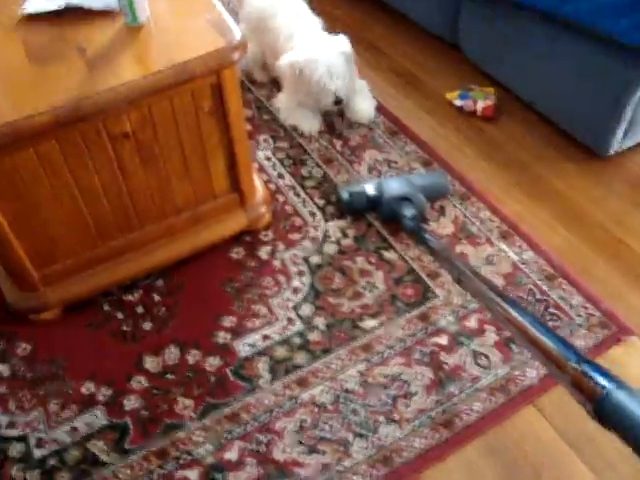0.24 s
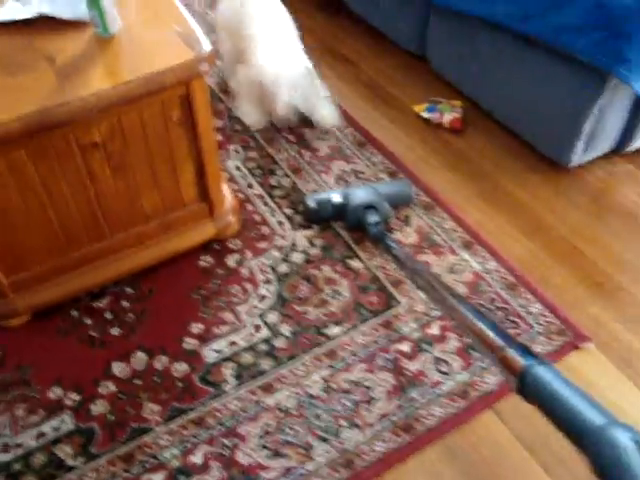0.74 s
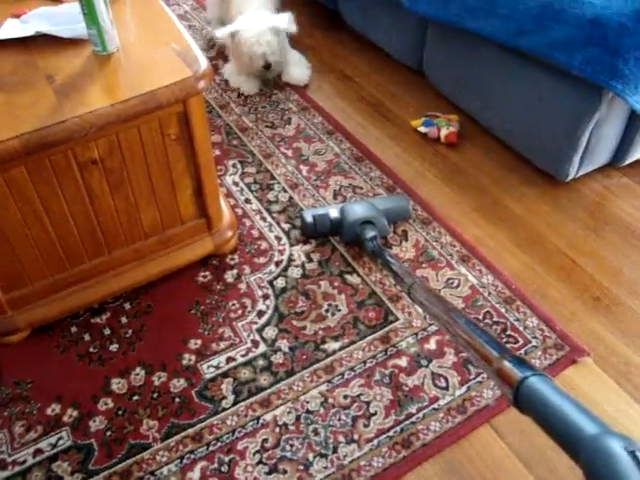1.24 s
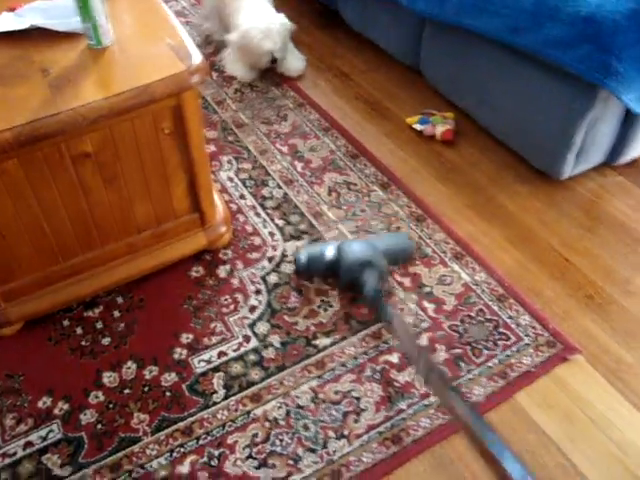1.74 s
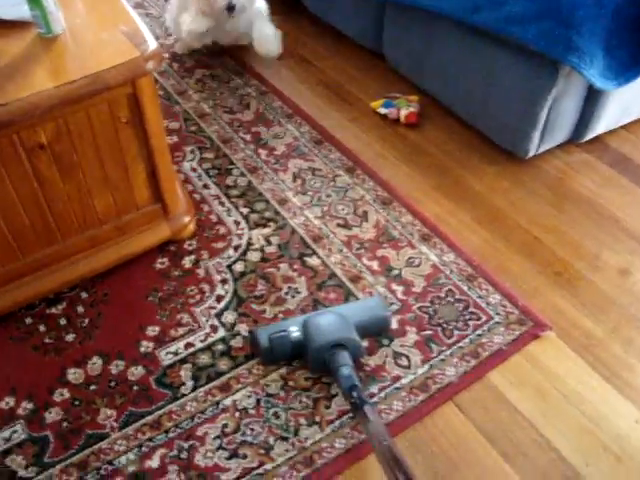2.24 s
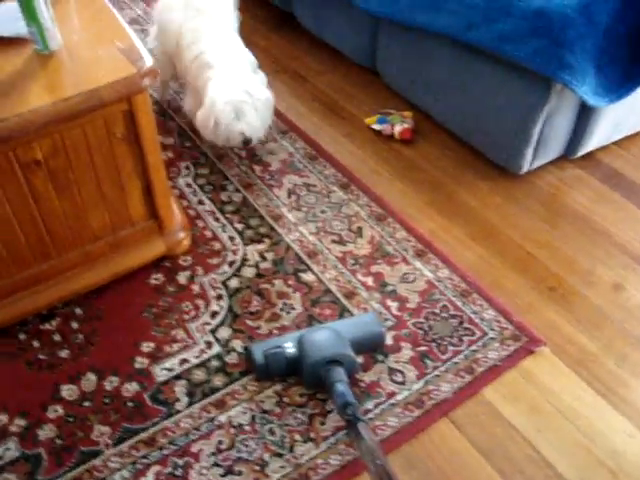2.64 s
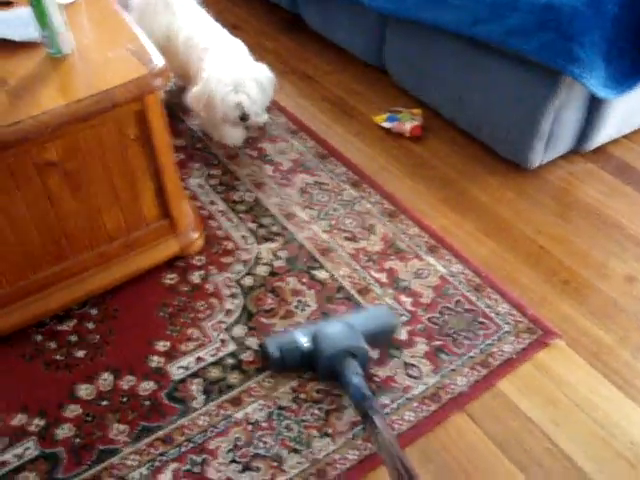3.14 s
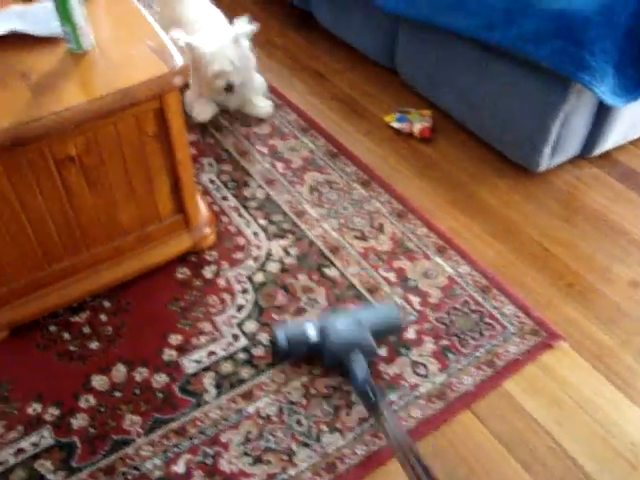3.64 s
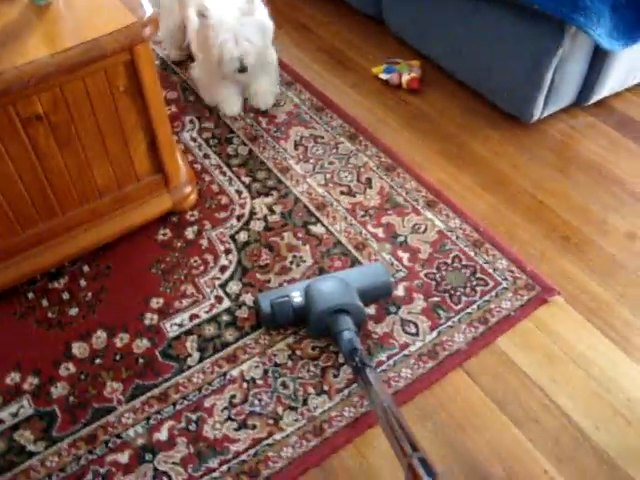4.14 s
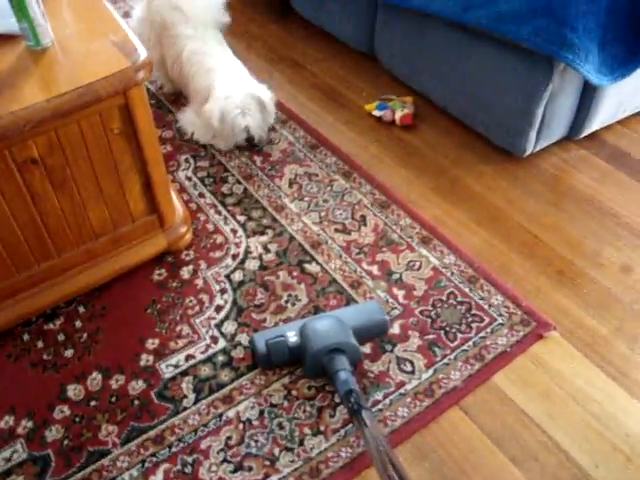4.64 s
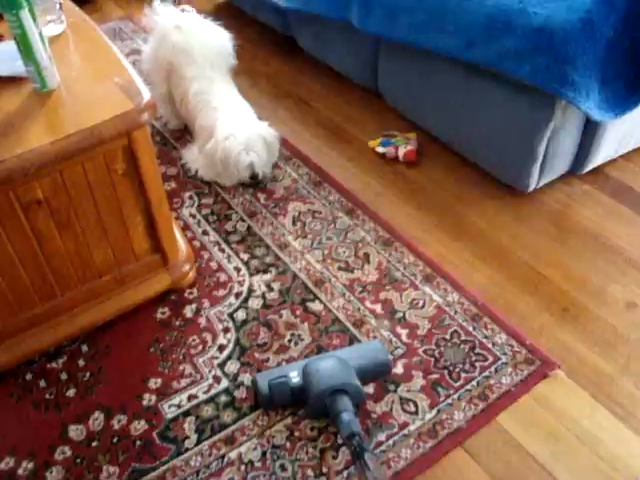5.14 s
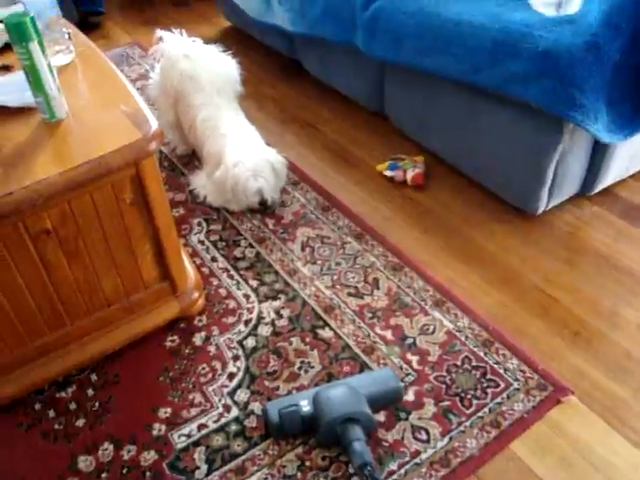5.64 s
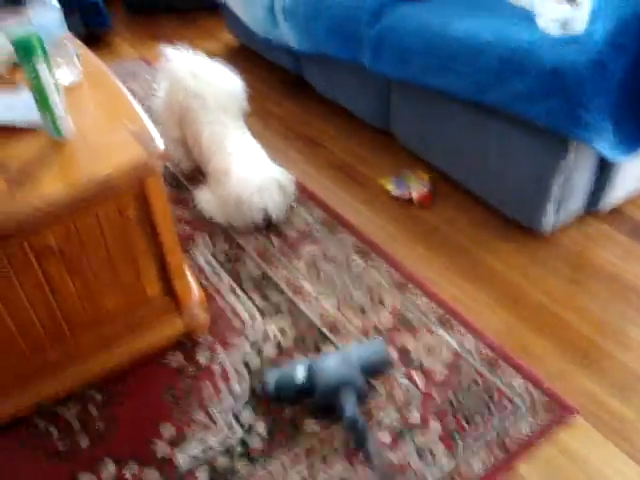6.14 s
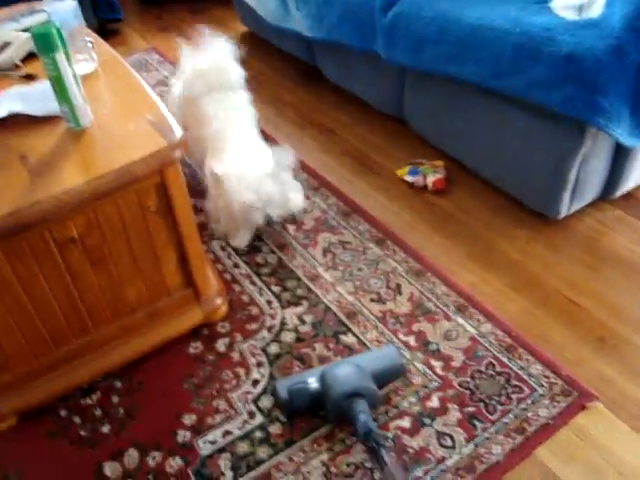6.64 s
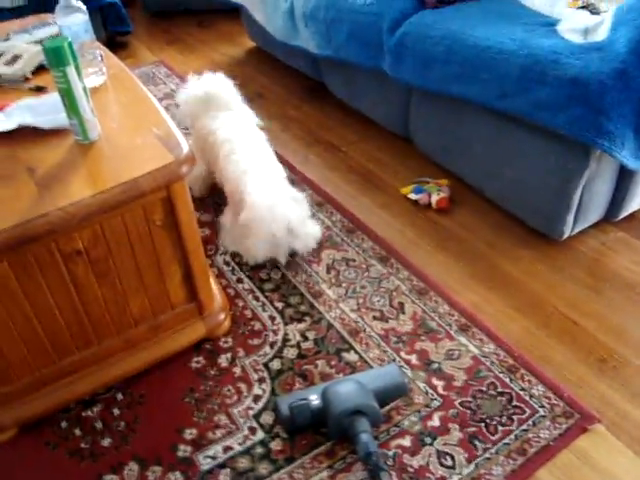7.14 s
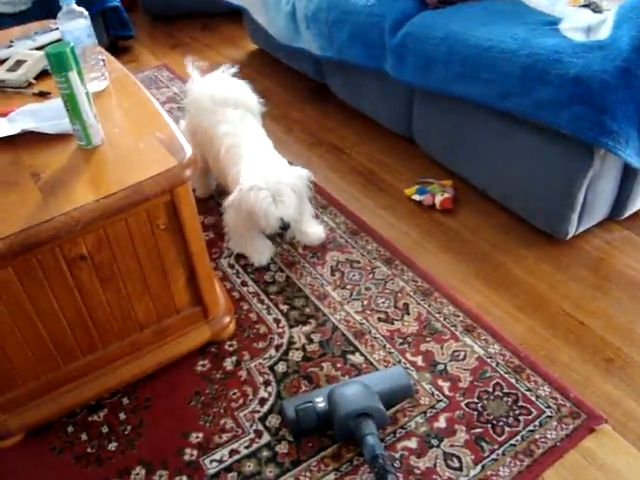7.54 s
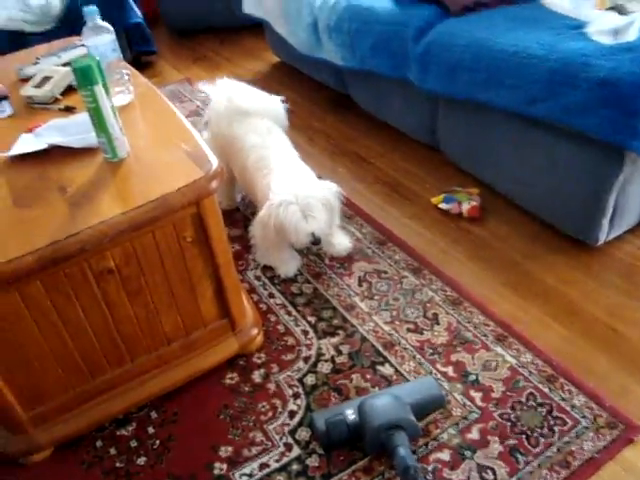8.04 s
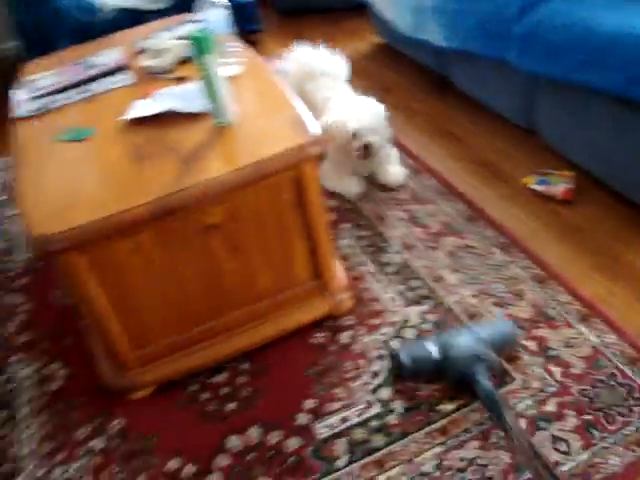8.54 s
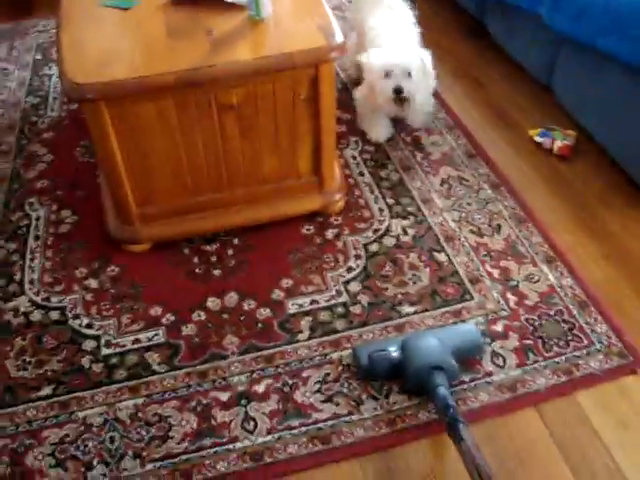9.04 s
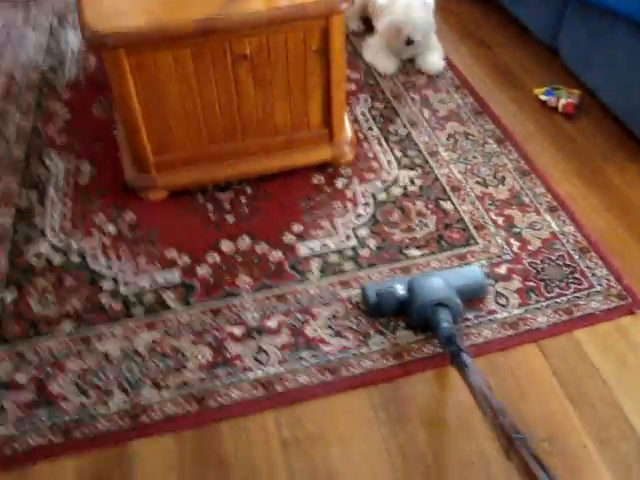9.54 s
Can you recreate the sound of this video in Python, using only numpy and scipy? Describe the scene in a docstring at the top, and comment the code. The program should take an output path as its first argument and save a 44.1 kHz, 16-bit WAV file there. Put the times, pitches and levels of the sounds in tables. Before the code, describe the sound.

Small excitable dog barks hoarsely at a running vacuum in a living room, pausing about two seconds midway before yapping again.

```python
"""A vacuum cleaner whines over rushing air, and at once a small dog yaps at it in quick runs in a living room.
The motor sounds harmonics of its shaft speed, with filtered noise for the air; each bark is a rough harmonic
source filtered by gliding throat resonances, and one faint whimper is a sagging near-sine. The room rings
after the dog; a small camera's gain control ducks at loud barks and creeps back up in the pauses."""
import sys
import numpy as np
from scipy import signal
from scipy.io import wavfile
from scipy.ndimage import uniform_filter1d

SR = 44100
rng = np.random.default_rng(int(sys.argv[2]) if len(sys.argv) > 2 else 0)


def output_pcm(signal):
    """Save a mono or channel-first signal as 16-bit PCM at the path in sys.argv[1].

    Samples are clipped to [-1, 1] before scaling.
    """
    pcm = np.clip(np.atleast_2d(signal).T, -1, 1) * 32767
    wavfile.write(sys.argv[1], SR, np.round(pcm).astype(np.int16))


N = 431298  # samples


def gain_of(db):
    """Amplitude ratio of a level difference: twenty decibels to a factor of ten."""
    return 10 ** (np.asarray(db) / 20)


def evened(x):
    """Normalization to unit mean power (rms 1)."""
    return x / np.sqrt(np.mean(x ** 2) + 1e-20)


def read(points, hz):
    """Interpolation of spectrum points along a logarithmic frequency axis."""
    f, value = np.transpose(points)
    return np.interp(np.log(hz + 1), np.log(f + 1), value)


def columns(rows, t):
    """Linear interpolation in time of each column of a table of curves."""
    s, *rest = np.transpose(rows)
    return [np.interp(t, s, c) for c in rest]


def add(mix, s, sound):
    """Superposition: a sound is summed into the mix from s seconds on."""
    part = mix[round(s * SR):][:len(sound)]
    part += sound[:len(part)]


def wander(count, span):
    """Low-pass random fluctuation: noise averaged twice over span samples, rms 1."""
    once = uniform_filter1d(rng.standard_normal(count), int(span))
    return evened(uniform_filter1d(once, int(span)))


def resonate(x, hz, width):
    """Resonance by heterodyning: shift the frequency hz to zero, low-pass, shift back; peak gain 1."""
    turn = np.exp(2j * np.pi * np.cumsum(hz * np.ones(len(x))) / SR)
    r = np.exp(-np.pi * width / SR)
    return 2 * (turn * signal.lfilter([1 - r], [1, -r], x / turn)).real


def air(spectrum, patchy_db):
    """Turbulence as random-phase noise with a given spectrum and drifting patches, rms 1."""
    frames, hz = N // 256 + 5, np.fft.rfftfreq(1024, 1 / SR)
    a, b, patches = rng.standard_normal((frames, 513, 3)).T
    patches = evened(uniform_filter1d(uniform_filter1d(patches, size=10, axis=0), size=12, axis=1))
    z = (a + 1j * b) * gain_of(read(spectrum, hz)[:, None] + patchy_db * patches)
    return evened(signal.istft(z, nperseg=1024, noverlap=768)[1][:N])


def vacuum():
    """Rotating machinery sounds at multiples of its shaft speed; the airflow adds whistles, rush and roar."""
    # Motor speed. Each row: time in seconds, blade-passing tone in Hz.
    motor = [(0, 5913), (.63, 5912), (1.3, 5932), (1.7, 5929), (2.1, 5908), (3, 5905), (4, 5902),
             (4.5, 5912), (5.6, 5919), (6.3, 5917), (6.8, 5908), (7.8, 5916), (8.3, 5911), (8.9, 5902),
             (9.3, 5911), (9.78, 5905)]
    # Shaft orders. Each row: multiple of shaft speed, level in dB before the swells.
    shaft = [(1, -39), (2, -53), (4, -54), (6, -57.5), (8, -68.5), (9, -40.5), (10, -62), (11, -69)]
    # Air whistles in hose and floor head. Each entry: centre in Hz.
    hose_hz = [192, 240, 387, 435, 472, 872, 969, 2891, 3176, 4598, 5583, 5749]
    # The same whistles. Each row: width in Hz, level in dB before the swells.
    hose = [(10, -63), (16, -62), (6, -55), (12, -54), (14, -56), (55, -47), (30.5, -50), (12, -50),
            (25, -56.5), (16, -75), (16, -57), (20, -59.5)]
    # Spectrum of the rushing air. Each row: frequency in Hz, relative density in dB per Hz.
    rush_spectrum = [(290, -58.5), (500, -18.5), (613, -18), (646, -8.5), (772, -14), (959, -13),
                     (1790, -14.5), (2810, -15), (5250, -21), (6120, -18), (6360, -24.5), (9820, -24.5),
                     (10600, -80.5), (13800, -83), (22000, -120)]
    # Spectrum of the floor-head roar. Each row: frequency in Hz, relative density in dB per Hz.
    roar_spectrum = [(30, -4.5), (110, -28.5), (180, -16), (300, -8), (450, 4), (600, -1.5), (800, -41.5)]
    # Swells and dips as the cleaner and camera move. Each row: time in seconds, then changes in dB
    # of the shaft hum, of the blade whine, and of the roar with the low whistles.
    swell = [(0, -1.5, -6.5, -3), (.6, -0.5, 0.5, -1.5), (.95, -3.5, -3, -2), (1.3, 0, 3, -3),
             (1.6, 1, 6, -1), (1.9, 1, -6.5, -1), (2.2, -4, -0.5, -4.5), (2.8, -2.5, 4.5, 1),
             (3.2, -0.5, 1.5, -1.5), (3.8, -8, -1, 0.5), (4.3, 2.5, 1.5, -3), (4.9, 1, -0.5, 2),
             (5.5, 1.5, 1, 0.5), (6.3, 4.5, -2, 2.5), (7, -2, -4.5, -3), (7.6, 1, 1, 3),
             (8.2, 3, -0.5, 4.5), (8.9, -6, 0, -2.5), (9.3, -1, 0, -3), (9.78, -2.5, -4, -2)]
    # Nearness of the cleaner. Each row: time in seconds, level change in dB.
    near = [(0, 7.5), (.63, 0.5), (1.3, 2), (1.8, -1), (2.3, -0.5), (3, 0.5), (3.8, -4.6), (4.7, 3.5),
            (5.4, -1), (6.3, 0.1), (7, 5), (7.7, 2.5), (8.3, 0), (8.9, 2.2), (9.78, 5.5)]
    blades, flutter_db, low_whistle_hz = 9, 0.9, 500

    t = np.arange(N) / SR
    speed = columns(motor, t)[0] / blades * (1 + 0.0003 * wander(N, 900))
    turns = np.cumsum(speed) / SR
    hum_db, whine_db, roar_db = columns(swell, t)
    tones = np.zeros(N)
    for order, db in shaft:
        swell_db = hum_db if order < blades / 2 else whine_db
        level = gain_of(db + swell_db + flutter_db * wander(N, 1400))
        phase = round(order) * turns + rng.random()
        tones += level * np.sqrt(2) * np.sin(2 * np.pi * phase)
    whistles = np.zeros(N)
    for hz, (width, db) in zip(hose_hz, hose):
        whistle = evened(resonate(rng.standard_normal(N), hz, width))
        whistles += gain_of(db + roar_db * (hz < low_whistle_hz)) * whistle
    rush = gain_of(-38.5) * air(rush_spectrum, patchy_db=0.3)
    roar = gain_of(-49 + roar_db) * air(roar_spectrum, patchy_db=-3.5)
    return gain_of(columns(near, t)[0]) * (tones + whistles + rush + roar)


def gesture(t, length, rise, effort_db, fade_db, start_hz, bend_hz, top_hz, end_hz):
    """Effort and pitch climb together; then effort fades while pitch sags and holds."""
    attack = 0.72 * rise
    climb_db = -18.5 * np.clip(1 - t / attack, 0, 1)
    fall_db = fade_db * np.clip((t - attack) / (length - attack), 0, 1) ** 1.66
    pitch_s = [0, 0.55 * rise, rise, rise + 0.035]
    hz = np.interp(t, pitch_s, [start_hz, bend_hz, top_hz, end_hz])
    return effort_db + climb_db + fall_db, hz


def mouth(t, length, rise, jaw_hz, jaw_shut_hz, tongue_hz, tongue_shut_hz, lip_hz,
          tongue_db, lip_db, onset_db, tongue_end_db, lip_end_db):
    """Articulation: jaw, tongue and lip resonances glide from open to shut; returns their Hz and dB."""
    shut, lip_lag, lip_shut_hz = 1.075 * rise, 0.03, 2296  # s, s, Hz
    muffle_db = onset_db * np.clip(1 - t / 0.033, 0, 1)  # passes as the mouth opens
    late = (t / length) ** 3.6
    jaw = np.interp(t, [0.39 * rise, shut], [jaw_hz, jaw_shut_hz])
    tongue = np.interp(t, [0, shut], [tongue_hz, tongue_shut_hz])
    lip = np.interp(t, [lip_lag, shut + lip_lag], [lip_hz, lip_shut_hz])
    tongue_level = tongue_db + muffle_db + tongue_end_db * late
    lip_level = lip_db + muffle_db + lip_end_db * late
    return (jaw, tongue, lip), (0, tongue_level, lip_level)


def bark(length, rise, effort_db, fade_db, rough, *shape):
    """Source and filter: jittered vocal-fold harmonics and puffs of noise excite moving throat resonances."""
    # Jaw, tongue and lip resonances. Each row: width in Hz of the first of two passes, base level in dB.
    throat_modes = [(320, 6.5), (380, 6.5), (550, 7.5)]
    # Fixed upper resonances. Each row: centre in Hz, first-pass width in Hz, level in dB at the onset.
    palate = [(4200, 700, -22), (8500, 3000, -28)]
    palate_fade_db = -2.5  # by the end of the bark

    t = np.arange(0, length, 1 / SR)
    effort_db, hz = gesture(t, length, rise, effort_db, fade_db, *shape[:4])
    mouth_hz, mouth_db = mouth(t, length, rise, *shape[4:])
    rough = np.clip(rough, 0, 1)
    # quick jitter and slower waver
    wobble = 0.1 * rough * wander(len(t), 44) + 0.017 * wander(len(t), 260)
    turns = np.cumsum(hz * (1 + wobble)) / SR
    folds = np.zeros(len(t))
    for k in range(1, 13):
        # a hoarse voice: each overtone breaks up on its own, the higher ones more
        breakup = gain_of(8.4 * rough * np.sqrt(k) * wander(len(t), 150))
        folds += breakup * np.cos(2 * np.pi * k * turns)
    folds *= 1 + 0.65 * rough * np.cos(np.pi * turns)  # strong-weak cycles
    puffs = (0.22 + np.exp(-(turns % 1) / 0.39)) * rng.standard_normal(len(t))
    drive = (1 - rough) * evened(folds) + rough * evened(puffs)

    modes = [(f, w, db + more_db) for f, (w, db), more_db in zip(mouth_hz, throat_modes, mouth_db)]
    modes += [(f, w, db + palate_fade_db * t / length) for f, w, db in palate]
    throat = np.zeros(len(t))
    for k, (f, w, db) in enumerate(modes):
        mode = resonate(resonate(drive, f, w), f, 2 * w)
        throat += (-1) ** k * gain_of(db) * mode  # neighbours in opposite sign
    # the chest carries the fundamental
    throat += gain_of(-16) * np.std(throat) * np.cos(2 * np.pi * turns)
    steady = throat / np.sqrt(uniform_filter1d(throat ** 2, size=600) + 1e-9)
    return gain_of(effort_db) * steady * signal.windows.tukey(len(t), 0.15)


def room(x):
    """Reverberation: sparse random-sign echoes decay band by band; three tails take turns as the dog moves."""
    # Reverberation time. Each row: frequency in Hz, time to fall by 60 dB in seconds.
    decay = [(300, 0.56), (900, 0.55), (1800, 0.52), (3000, 0.41), (5000, 0.64), (9000, 0.067)]
    out = np.zeros(N)
    for k in range(3):
        taps = np.zeros(SR)
        at = np.arange(120, SR - 20, 20)
        taps[at + rng.integers(0, 20, len(at))] = rng.choice([-1., 1.], len(at))
        hz, t, z = signal.stft(taps, SR, nperseg=256)
        fade = gain_of(-60 * t / read(decay, hz)[:, None])
        tail = signal.istft(z * fade, SR, nperseg=256)[1]
        # the squares of the three shares always sum to 1
        share = np.cos(np.pi * (np.arange(N) / SR + k / 3)) * np.sqrt(2 / 3)
        out += signal.fftconvolve(x * share, tail / np.linalg.norm(tail))[:N]
    return out


def whimper(length, hz, db):
    """Frequency modulation: a faint, slightly unsteady near-sine that fades and sags in pitch."""
    sag_hz, fade_db, flicker_db, rise_s = 40, -22, 4, 0.015
    t = np.arange(0, length, 1 / SR)
    pitch = (hz - sag_hz * t / length) * (1 + 0.03 * wander(len(t), 150))
    tone = np.sin(2 * np.pi * np.cumsum(pitch) / SR)
    level = gain_of(db + fade_db * t / length + flicker_db * wander(len(t), 300))
    return level * tone * np.minimum(t / rise_s, 1) ** 2


def scene():
    """Superposition of the dog's direct sound, its room echo and the cleaner."""
    # Barks. Each row: start, length and pitch rise in seconds, effort and fade in dB, roughness from 0 to 1,
    # pitch at start, bend, top and end in Hz, jaw resonance open and shut in Hz,
    # tongue resonance open and shut in Hz, lip resonance open in Hz, tongue and lip level offsets in dB,
    # their shared change at the onset in dB, tongue and lip changes by the end in dB.
    barks = [ (0.032, 0.17, 0.1, -2, -9.5, 0.31, 435, 654, 926.4, 855.6, 1290, 870, 2060, 1810, 2470, -1, -5, -11, 4.5, 9),
             (0.622, 0.18, 0.065, -4.5, -20.5, 0.32, 500, 692, 880.4, 889, 970, 860, 1550, 1620, 2920, -3.5, -3, -14, 4, -7),
             (0.972, 0.15, 0.051, -5, -6, 0.3, 466, 678, 899, 835.7, 930, 866, 1850, 1574, 2590, 3, -1.5, -6, 3, -15),
             (1.303, 0.11, 0.056, -3, -7, .24, 537, 687.5, 827.5, 781, 1030, 800, 1470, 1590, 3140, 1, -6, -17, 3, 4),
             (1.938, 0.15, 0.059, -5.5, -9, 0.28, 467, 688.5, 956.5, 803, 1030, 890, 1800, 1660, 3200, -7, -9, -24, 16.5, 7),
             (2.353, 0.14, 0.067, -3.5, -6.5, .29, 506.6, 717, 905, 819, 1120, 840, 1580, 1600, 2820, -1.5, -6.5, -13, 6.5, -2),
             (3.285, 0.091, 0.053, -23, -2, 0.52, 479.3, 485, 522, 465, 1100, 950, 1700, 2110, 2680, -8.5, -8.5, 3, -5, -3),
             (3.428, 0.15, 0.074, -10.5, -4, 0.31, 521, 692, 864, 805.6, 1050, 930, 2100, 1660, 2720, 2.5, -2, -8, -5, -3),
             (3.92, 0.13, .07, -5.5, -8.5, .3, 560.7, 757, 911, 859, 1024, 840, 1470, 1740, 3000, -3, -5.5, -26, -5, -1),
             (4.342, 0.18, 0.07, -1.5, -17, 0.29, 487.6, 727, 946, 769, 1064, 810, 1560, 1540, 3170, -2.5, -10, -9, -3, -6),
             (6.433, 0.16, .064, -3.5, -13, 0.35, 479, 651, 946, 850, 965, 854, 2170, 1690, 3180, 2, -5, -22, -10, 0),
             (6.738, 0.15, .054, 1.5, -15.5, 0.31, 513.7, 724.6, 935, 822, 966, 880, 1540, 1710, 3300, -2.5, -3.5, -24, -5.5, 2),
             (7.068, 0.13, 0.046, -0.5, -9, 0.33, 526, 681.4, 927, 843, 960, 815, 1720, 1630, 2670, 2, -2, -5, -1, -5),
             (8.214, 0.12, 0.047, -5.5, -14, 0.34, 444, 623, 708, 727, 970, 925, 2260, 1930, 2950, 1.5, 1, -14, 3, -6),
             (8.53, 0.15, 0.057, -3.5, -12.5, 0.34, 576, 718, 961.5, 870, 1070, 800, 1880, 1600, 2710, 3, -1.5, -12, -7.5, -8),
             (8.989, .16, 0.068, -0.5, -8, 0.26, 522.5, 680.7, 910.6, 837, 1130, 895, 2040, 1510, 2970, 3, -3.5, 1, -10, -7),
             (9.41, .15, 0.085, 1.5, -9, 0.35, 463.7, 699.6, 892.5, 863, 1310, 970, 1600, 1850, 3490, 5.5, -9, -10, -7, 0),
             ]
    # A soft whimper. The row: start and length in seconds, starting pitch in Hz, level in dB before its fade.
    whimper_row = (2.77, .36, 1155, -27)
    dog = np.zeros(N)
    for start, *row in barks:
        add(dog, start, bark(*row))
    add(dog, whimper_row[0], whimper(*whimper_row[1:]))
    return (dog + gain_of(-6.5) * room(dog) + vacuum())[None]


def held(db, db_per_s, start_db):
    """Peak detection: follows rises at once and lets go at a steady rate."""
    ramp = np.arange(N) * db_per_s / SR
    return np.maximum.accumulate(np.maximum(db + ramp, start_db)) - ramp


def record(dry):
    """Level-dependent low cut, slow gain control, saturation of a lopsided stage, then band limits."""
    power_db = 10 * np.log10(abs(uniform_filter1d(dry[0] ** 2, size=1200)) + 1e-12)
    # loud sound brings in the low cut
    bass_band = signal.butter(4, [60, 500], "band", fs=SR, output="sos")
    bass = signal.sosfiltfilt(bass_band, dry)
    shut = np.clip((held(power_db, 63.0, -12.0) + 31.5) / 2, 0, 1)
    cut = dry - 0.63 * uniform_filter1d(shut, size=1500) * bass
    # the gain drops with rising level and recovers by 16.55 dB a second, up to 13.5 dB
    lift_db = np.minimum(-7.0 - held(power_db, 16.55, -10.0), 13.5)
    loud = cut * gain_of(uniform_filter1d(lift_db, size=300))
    drive = 1.01 * loud + 0.004 * loud ** 2  # slightly lopsided stage
    clipped = 0.89 * drive / (1 + abs(drive) ** 4) ** 0.28
    low_limit = signal.butter(1, 250, "high", fs=SR, output="sos")
    clipped = signal.sosfilt(low_limit, clipped)
    high_limit = signal.firwin(127, 10300, window=("kaiser", 7), fs=SR)
    return signal.oaconvolve(clipped, high_limit[None], "same")


dry = scene()
out = record(dry)
output_pcm(out)
```